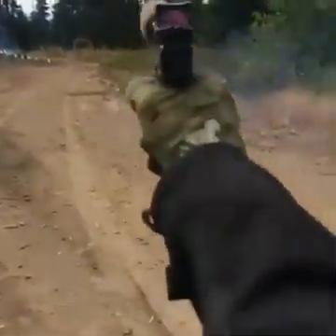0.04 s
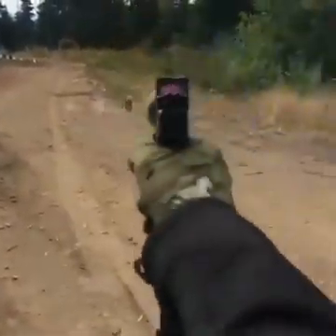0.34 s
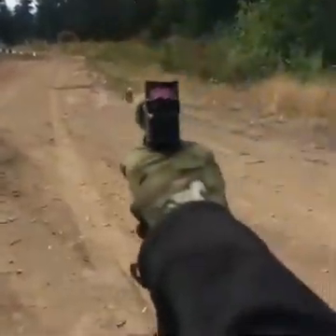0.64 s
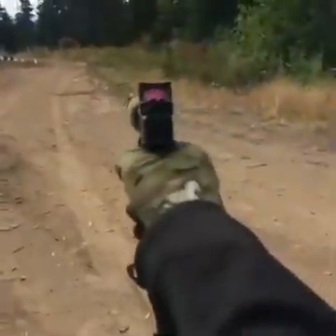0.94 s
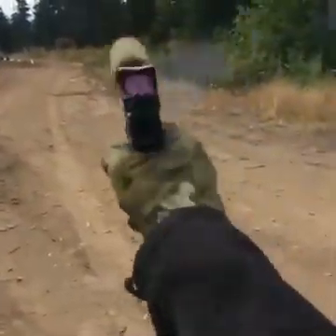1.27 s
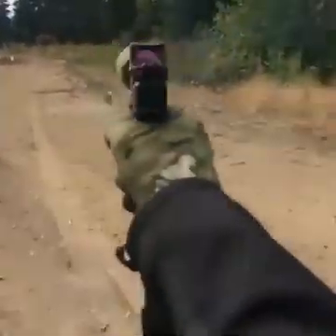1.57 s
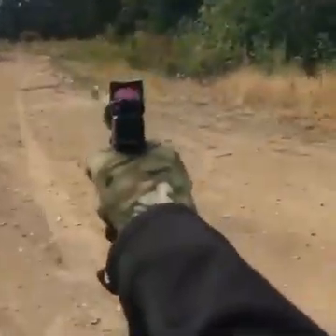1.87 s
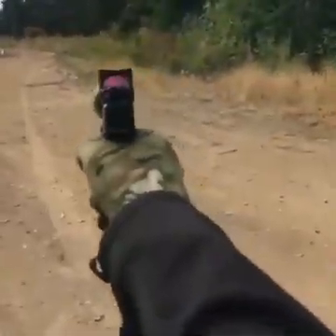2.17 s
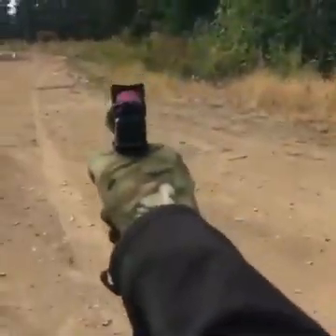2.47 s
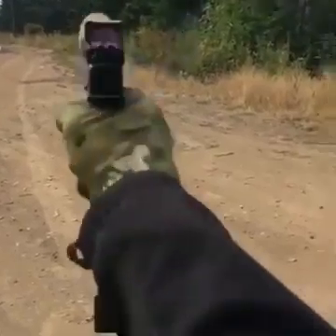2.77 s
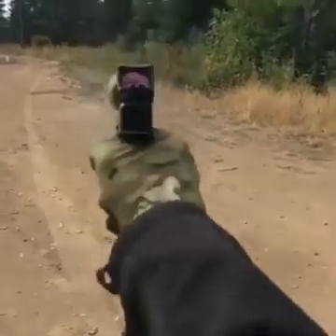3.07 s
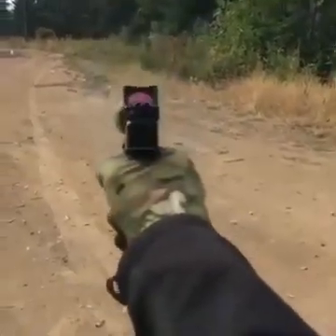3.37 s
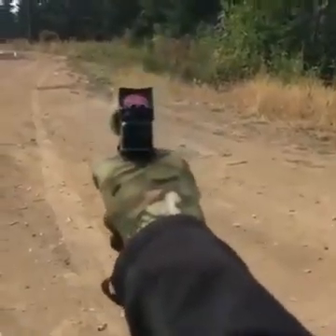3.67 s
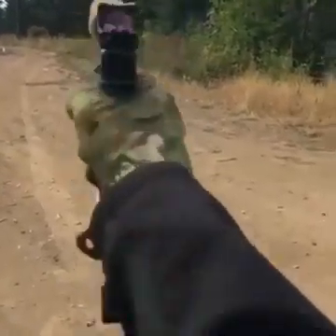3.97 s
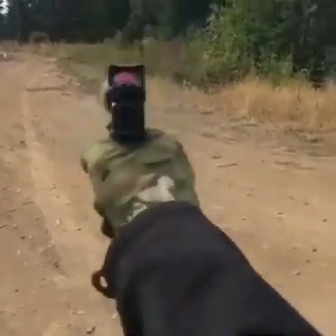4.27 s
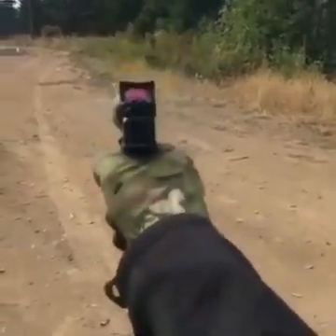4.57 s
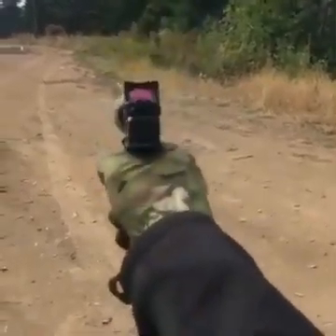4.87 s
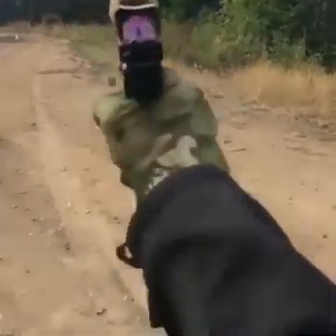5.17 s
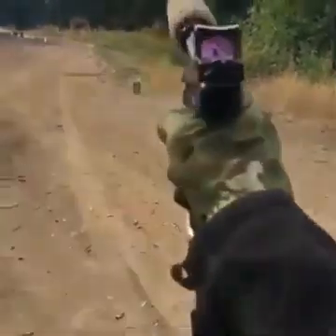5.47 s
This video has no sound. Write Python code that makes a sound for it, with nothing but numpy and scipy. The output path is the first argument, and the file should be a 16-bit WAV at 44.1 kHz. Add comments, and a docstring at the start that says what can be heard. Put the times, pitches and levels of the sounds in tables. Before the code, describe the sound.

A steel target is already ringing from an earlier shot. Then a suppressed pistol fires four times at arm's length from the microphone, a little over a second apart, each a sharp crack with a thump, a gas hiss and a slide clack. The first three are followed by a bright steel clang; the last only slaps dirt. Trees echo the shots, spent cases tick faintly on the ground, and light wind bumps the microphone.

```python
"""A dirt range in the forest, one microphone an arm's length from a suppressed pistol.
Five shots, the first already past: each blast bounces off the ground, gas hisses out, the slide slams
shut, and a tenth of a second later a steel plate rings down range. The last bullet only slaps the dirt.
The trees scatter the sound back, spent cases land, and wind buffets the microphone."""
import sys
import numpy as np
from scipy import signal
from scipy.fft import rfft, irfft, next_fast_len
from scipy.io import wavfile
from scipy.ndimage import uniform_filter1d

SR = 44100
rng = np.random.default_rng(int(sys.argv[2]) if len(sys.argv) > 2 else 0)


def store_pcm(level_fs):
    """Save levels as 16-bit WAV."""
    pcm = np.round(np.clip(level_fs, -1, 1) * 32767).astype(np.int16)
    wavfile.write(sys.argv[1], SR, np.atleast_2d(pcm).T)


N = 243873
TIME = np.arange(N) / SR
AGE = TIME[:N // 2]  # seconds since an event began


def undb(db):
    """Decibels to gain."""
    return 10 ** (np.asarray(db) / 20)


def fade(t60_s, age=AGE):
    """Exponential decay that loses 60 dB in t60_s."""
    return np.exp(-np.log(1000) * age / t60_s)


def burst(start_s, rise_s, t60_s):
    """Envelope that swells from its start and dies away."""
    age = np.maximum(AGE - start_s, 0)
    return (1 - np.exp(-age / rise_s)) * fade(t60_s, age)


def add(out, start_s, x):
    """Mix x into out from start_s, dropping what falls outside."""
    offset = int(round(start_s * SR))
    first, end = max(offset, 0), min(offset + len(x), len(out))
    if end > first:
        out[first:end] += x[first - offset:end - offset]


def noise(spectrum, size=len(AGE)):
    """Noise of rms 1, shaped by rows of freq_hz, level_db."""
    hz, db = np.transpose(spectrum)
    n = next_fast_len(size)
    bins_hz = np.maximum(np.fft.rfftfreq(n, 1 / SR), 1)
    gain = undb(np.interp(np.log(bins_hz), np.log(hz), db))
    x = irfft(rfft(rng.standard_normal(n)) * gain, n)[:size]
    return x / x.std()


def flicker(rate_hz, depth_db, size=len(AGE)):
    """A gain that wanders at random, rate_hz times a second."""
    steps = rng.standard_normal(4096)
    return undb(depth_db * np.interp(TIME[:size] * rate_hz, np.arange(len(steps)), steps))


def pressure_wave(start_s, push_s):
    """A sudden overpressure followed by a longer suction."""
    age = np.maximum(AGE - start_s, 0) / push_s
    return (AGE > start_s) * (1 - age) * np.exp(-age)


def boom(hz):
    """Churning air: noise in one broad hump around hz."""
    return noise([(hz / 8, -26), (hz / 3, -7), (hz, 0), (1.5 * hz, -4), (2.3 * hz, -20), (7 * hz, -44)])


# Spectra of the action's clicks, the crack of muzzle and slide, and the gas: freq_hz, level_db
CLICK_SPECTRUM = [(150, 0), (600, 0.5), (1500, 0), (2800, 5.5), (3500, -8.5), (4200, -14.5), (7000, -17.5),
                  (14000, -33)]
CRACK_SPECTRUM = [(120, -31), (200, 1.5), (334, -18), (590, -18), (851, -16), (1620, -8), (2510, -12.5),
                  (3690, -14), (4040, -16), (4860, -6.5), (8740, -17.5), (12800, -17), (16000, -43)]
GAS_SPECTRUM = [(59, -31), (100, -8), (181, -5), (295, -10.5), (872, -9.5), (1030, -17.5), (1610, -2),
                (1830, -6.5), (2990, -4.5), (6020, -5.5), (6990, -9), (12900, -9.5), (16000, -27.5)]
# Shots at arm's length:
# start_s, crack_db, wave_db, boom_hz, gas_db, slide_db, recoil_db, jolt_db, echo_db
PISTOL_SHOTS = [(-.14, -6.5, -9.5, 600, -42, -16, -15, -21, -25),
                (1.3463, -6, -7.5, 420, -18, -16.5, -9.5, -16, -36),
                (2.7715, -4, -18.5, 571, -15, -34.5, -24.5, -20.5, -36.5),
                (3.9101, -3, -8, 512, -18.5, -11, -19, -18, -33.5),
                (5.0658, -6, -8.5, 800, -21, -43, -15, -36.5, -30)]


def pistol(ground_s=.0066, slide_s=.0415, trigger_db=-30, striker_db=-15, reset_s=.435, reset_db=-28):
    """Close up: trigger, striker, the blast and its ground bounce, venting gas, the slide closing."""
    out = np.zeros(N)
    for start_s, crack_db, wave_db, boom_hz, gas_db, slide_db, *_ in PISTOL_SHOTS:
        trigger = noise(CLICK_SPECTRUM) * burst(0, .003, .24)
        striker = noise(CLICK_SPECTRUM) * burst(0, .0024, .07)
        add(out, start_s - .023, undb(crack_db + trigger_db) * trigger)
        add(out, start_s - .012, undb(crack_db + striker_db) * striker)
        crack = noise(CRACK_SPECTRUM) * flicker(1500, 2.5)
        crack *= burst(0, .0005, .022) + undb(-2) * burst(ground_s, .0002, .018)
        wave = pressure_wave(0, .0029) + undb(-2.5) * pressure_wave(ground_s, .011)
        wave += undb(-1) * boom(boom_hz) * burst(0, .0011, .065)  # the gas cloud churns at the muzzle
        gas = noise(GAS_SPECTRUM) * flicker(250, 2.2) * burst(.003, .003, .7)
        gas *= fade(.17, np.maximum(AGE - .049, 0))  # the hiss dies quickly once the breech shuts
        slide = noise(CRACK_SPECTRUM) * burst(slide_s, .0017, .033)
        slide -= undb(9) * pressure_wave(slide_s, .00043)
        blast = undb(crack_db) * crack + undb(wave_db) * wave
        add(out, start_s, blast + undb(gas_db) * gas + undb(slide_db) * slide)
    # the trigger is let out after the last shot
    reset = noise(CLICK_SPECTRUM) * burst(0, .0013, .037)
    add(out, PISTOL_SHOTS[-1][0] + reset_s, undb(reset_db) * reset)
    return out


def air_push(centre_s, level_db, pitch_hz, width_cycles=.52):
    """One push and pull of air on the microphone's diaphragm."""
    out = np.zeros(N)
    cycles = (TIME - centre_s) * pitch_hz
    near = abs(cycles) < 3
    window = np.exp(-(cycles[near] / width_cycles) ** 2)
    out[near] = -undb(level_db) * np.sin(2 * np.pi * cycles[near]) * window
    return out


def pistol_thumps():
    """The recoil and the jolt of the slide each reach the microphone as a low thump."""
    out = np.zeros(N)
    for start_s, *_, recoil_db, jolt_db, _ in PISTOL_SHOTS:
        out += air_push(start_s - .0054, recoil_db, pitch_hz=150)
        out += air_push(start_s + .045, jolt_db, pitch_hz=110)
    return out


def absorb(x, loss_db):
    """Later echoes have crossed more air, which takes loss_db per second and kHz."""
    hz, age, spectrum = signal.stft(x, SR, nperseg=512)
    khz = hz[:, None] / 1000
    return signal.istft(spectrum * undb(-loss_db * khz * age), SR)[1][:len(x)]


# Spectrum of the echo off the trunks: freq_hz, level_db
TREE_SPECTRUM = [(80, -40.5), (200, -15.5), (350, -17), (600, -12), (1100, -5), (1500, -4), (2400, -4),
                 (4000, -4), (6500, -3.5), (10000, -3), (14000, -9)]


def forest():
    """Nearby trunks answer each shot at once; the far treeline returns a grainy tail that dulls."""
    out = np.zeros(N)
    near_trees = undb(15.5) * burst(start_s=.047, rise_s=.07, t60_s=.47)
    treeline = undb(22) * burst(start_s=.23, rise_s=.67, t60_s=1.893)
    for start_s, *_, echo_db in PISTOL_SHOTS:
        trunks = noise(TREE_SPECTRUM) * flicker(30, 2.4) * flicker(500, 2.2)
        add(out, start_s, undb(echo_db) * (near_trees + treeline) * absorb(trunks, loss_db=10))
    return out


# Modes of the steel plate; where the bullet lands sets each one's share:
# pitch_hz, t60_s, strike1_db, strike2_db, strike3_db, strike4_db
PLATE_MODES = [(377.4, 2.7, -47, -36, -24, -23), (490, .7, -56, -46, -38, -36),
               (753.5, .35, -26, -25, -17, -18), (754, 2.6, -37, -41, -40, -42),
               (833, .6, -42, -36, -29, -27), (888, 1.0, -44, -33, -13, -14),
               (993, .36, -42, -27, -15, -10), (1216, .28, -48, -47, -32, -18),
               (1564, .55, -32, -24, -15, -31), (1592, .45, -31, -19, -28, -29),
               (1898, .75, -23, -18, -25, -26), (1910, .6, -30, -27, -24, -25),
               (2008, .35, -34, -23, -33, -30), (2334, .42, -36, -30, -19, -19),
               (2431, .35, -39, -39, -23, -22), (2973, .36, -40, -52, -20, -30),
               (3227, .36, -24, -15, -16, -17), (3354, .34, -38, -23, -24, -23),
               (3607, .25, -31, -21, -35, -12), (4011, .28, -33, -25, -28, -32),
               (4125, .35, -44, -29, -26, -38), (4655, .3, -44, -42, -29, -36),
               (5000, .3, -38, -35, -39, -27), (5070, .3, -39, -35, -26, -44),
               (5733, .33, -24, -30, -39, -50), (5843, .35, -23, -20, -35, -52),
               (6501, .28, -22, -21, -35, -42), (7558, .33, -41, -34, -29, -39),
               (7897, .3, -29, -29, -33, -36), (8331, .3, -39, -31, -34, -35)]


def plate_ring(strike, detune=.003):
    """Each mode is a close pair that beats and wavers as the plate swings; the lowest are steadiest."""
    ring = np.zeros(len(AGE))
    for hz, t60_s, *shares_db in PLATE_MODES:
        age = AGE[AGE < t60_s]
        wobble = .65 * min(hz / 2000, 1) * np.log(flicker(60, 8.7, size=len(age)))
        phase = 2 * np.pi * hz * age + wobble
        twin_gain = .4 * min(hz / 1000, 1) ** 2
        pair = (np.sin(phase) + twin_gain * np.sin(phase * (1 + detune))) / (1 + twin_gain)
        waver = flicker(35, min(hz / 800, 3.5), size=len(age))
        add(ring, 0, undb(shares_db[strike]) * pair * waver * fade(t60_s, age))
    return ring


# Spectrum of a bullet's impact, on steel or dirt: freq_hz, level_db
IMPACT_SPECTRUM = [(150, -22.5), (500, -7), (1000, -3), (2500, 0.5), (4500, 1), (6500, -2.5), (9000, -8),
                   (12500, -11), (16000, -35)]


def plate_clang(count=70, t60_s=.23):
    """A crowd of weak, short-lived high modes in the steel."""
    age = AGE[:SR // 2]
    position, strength = rng.random((count, 2)).T
    hz = 1200 + 12000 * position ** 1.5
    gains = strength * undb(np.interp(hz, *np.transpose(IMPACT_SPECTRUM)))
    modes = np.sin(2 * np.pi * hz[:, None] * age)
    return gains @ modes / np.linalg.norm(gains) * fade(t60_s, age)


# Bullets on the plate, down range: start_s, ring_db, splash_db, rise_s, knock_db, swing_s, damping_db
PLATE_STRIKES = [(-.03, 4.5, -11.5, 0.014, -14, 0.58, -10), (1.441, 2, -14.5, 0.0089, -20.5, 1.3, -10.5),
                 (2.8671, 1, -13.5, 0.0097, -1, 0.38, -24), (4.0058, 1.5, -13, 0.018, 0, 0.49, -21)]


def plate(echo_db=-19):
    """A low bump leads into each hit; the bullet knocks, lead splashes, the steel rings and the trees prolong
    it."""
    out = np.zeros(N)
    for strike, row in enumerate(PLATE_STRIKES):
        start_s, ring_db, splash_db, rise_s, knock_db, swing_s, damping_db = row
        # the plate swings back against its hanger, which damps it
        damping = undb(damping_db * np.clip((AGE - swing_s) / .2, 0, 1))
        ring = undb(ring_db) * plate_ring(strike) * damping
        add(ring, 0, undb(splash_db - 3) * plate_clang())
        ring *= 1 - np.exp(-AGE / rise_s)
        splash = noise(IMPACT_SPECTRUM) * flicker(300, .6)
        splash *= undb(-5) * burst(0, rise_s, .27) + undb(-5.5) * burst(0, .0002, .073)
        hit = ring + undb(splash_db) * splash
        scatter = absorb(rng.standard_normal(len(AGE)), loss_db=4) * burst(.015, .05, 1.9)
        echo = signal.fftconvolve(hit, scatter / np.linalg.norm(scatter))[:len(AGE)]
        knock = uniform_filter1d(pressure_wave(.00099, .0027), size=24)
        knock += undb(-19) * boom(490) * burst(0, .00077, .058)
        add(out, start_s, hit + undb(echo_db) * echo - undb(knock_db) * knock)
        out += air_push(start_s - .0032, knock_db - 17, pitch_hz=78)
    return out


# Spectra of wind on the microphone and in the trees: freq_hz, level_db
RUMBLE_SPECTRUM = [(20, -21), (50, 4), (85, 0.5), (150, -10.5), (250, -20), (500, -41.5), (2000, -75)]
HUSH_SPECTRUM = [(40, -24), (150, -10), (400, -2), (1000, -8), (2000, -7), (4000, -24), (8000, -27),
                 (12000, -31), (14000, -36.5), (16000, -56)]
# Gusts at the microphone: peak_s, level_db, half_length_s
WIND_GUSTS = [(0.623, -56.5, 0.98), (2.486, -49.5, 0.38), (3.413, -40.5, 0.11), (4.538, -55.5, 0.064)]


def breeze(calm_db=-67, hush_db=-60.5):
    """Gusts swell and sink as an uneven rumble, over the faint hush of the trees."""
    gusts = sum(undb(db) * np.exp(-((TIME - peak_s) / half_s) ** 2) for peak_s, db, half_s in WIND_GUSTS)
    rumble = noise(RUMBLE_SPECTRUM, size=N) * flicker(12, 2.4, size=N)
    hush = noise(HUSH_SPECTRUM, size=N) * flicker(6.6, 3.7, size=N)
    return (undb(calm_db) + gusts) * rumble + undb(hush_db) * hush


# Bullets and fragments hitting the dirt, down range: start_s, level_db, spray_t60_s
DIRT_SLAPS = [(0.135, -29.5, 0.022), (1.576, -31.5, 0.041), (2.9754, -30.5, 0.088), (4.083, -32, 0.13),
              (5.158, -29, 0.13), (5.195, -32.5, 0.025)]


def dirt_slaps():
    """Lead hits the dirt with a sharp snap and throws up a spray of grit that settles."""
    out = np.zeros(N)
    snap = undb(4) * burst(0, .00022, .018)
    settle = undb(-15) * burst(0, .045, .083)
    for start_s, level_db, spray_t60_s in DIRT_SLAPS:
        spray = undb(3.5) * burst(0, .00076, spray_t60_s)
        grit = noise(IMPACT_SPECTRUM) * flicker(860, .93)
        add(out, start_s, undb(level_db) * grit * (snap + spray + settle))
    return out


# The strongest buffets, right on the microphone: centre_s, level_db
WIND_BUFFETS = [(0.677, -31.5), (1.026, -34.5), (1.105, -34.5), (1.133, -31), (1.188, -30), (2.224, -37),
                (3.429, -32), (3.488, -24.5), (3.529, -28)]


def buffets():
    """Eddies in the gusts bump the microphone."""
    return sum(air_push(centre_s, level_db, pitch_hz=94.3) for centre_s, level_db in WIND_BUFFETS)


# Spectrum of brass ticking on stone: freq_hz, level_db
TICK_SPECTRUM = [(500, 4), (1300, 0), (2500, 3.5), (4800, 3), (6500, -24), (9000, -3), (13000, -12),
                 (15000, -30)]
# Spent cases landing: start_s, tick_db, ring_db
CASE_LANDINGS = [(.78, -49.5, -76), (0.949, -57.5, -56), (0.972, -55, -50), (2.079, -46, -66.5),
                 (2.2737, -35.5, -40), (3.705, -42, -57.5), (4.7705, -43, -73.5)]


def cases(modes_hz=(11200, 12200, 13000), bounce_s=.282):
    """Brass ticks on the stony ground, rings very high and bounces once, more softly."""
    out = np.zeros(N)
    for start_s, tick_db, ring_db in CASE_LANDINGS:
        tick = undb(tick_db) * noise(TICK_SPECTRUM)
        tick *= burst(0, .0001, .015) + undb(-19) * burst(0, .002, .21)
        pitches_hz = [hz * (1 + .02 * rng.standard_normal()) for hz in modes_hz]
        ring = sum(np.sin(2 * np.pi * hz * AGE) for hz in pitches_hz) / 2
        ring *= undb(ring_db) * flicker(1300, 4.3)
        ring *= burst(0, .0005, .05) + undb(-14) * burst(0, .01, .2)
        add(out, start_s, tick + ring)
        add(out, start_s + bounce_s, undb(-25) * tick + undb(-13.5) * ring)
    return out


def scene():
    """The shooting and the wind, in mono from beside the pistol."""
    shooting = pistol() + pistol_thumps() + forest() + plate() + dirt_slaps() + cases()
    return (shooting + buffets() + breeze())[None]


def record(dry, low_hz=48, top_hz=16000):
    """The microphone drops the deepest bass and rounds the loudest peaks; the top is cut."""
    low_cut = signal.butter(2, low_hz, "highpass", fs=SR, output="sos")
    high_cut = signal.ellip(8, .2, 70, top_hz, fs=SR, output="sos")
    rounded = np.tanh(signal.sosfilt(low_cut, dry))
    return signal.sosfilt(high_cut, rounded)


dry = scene()
out = record(dry)
store_pcm(out)
```